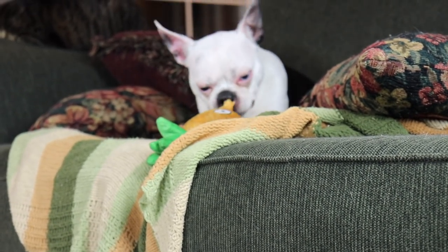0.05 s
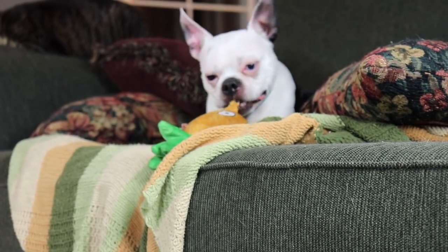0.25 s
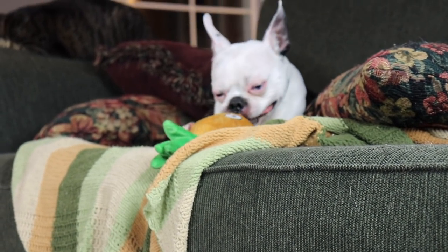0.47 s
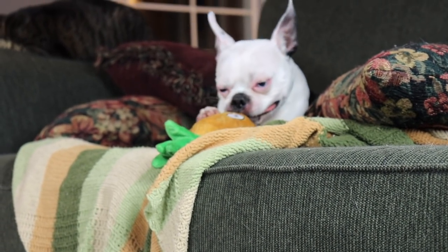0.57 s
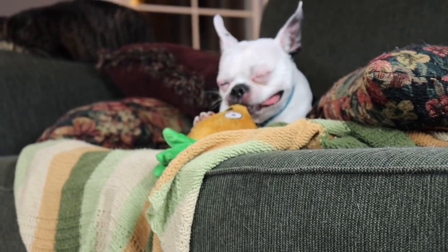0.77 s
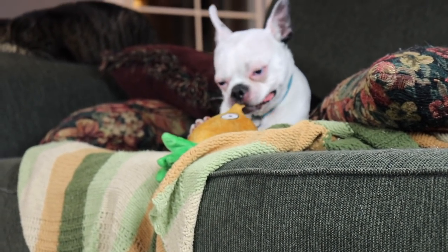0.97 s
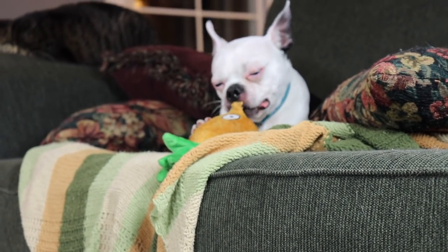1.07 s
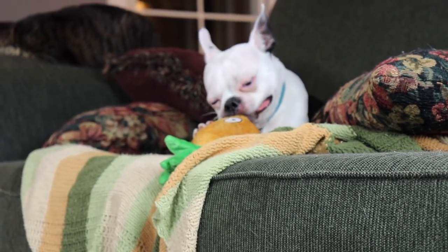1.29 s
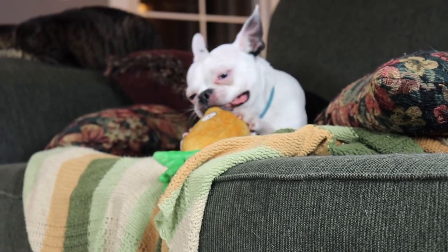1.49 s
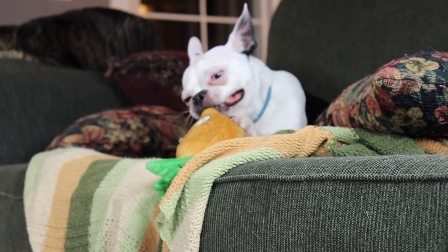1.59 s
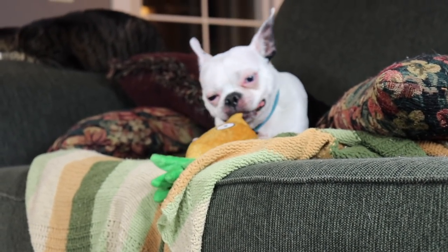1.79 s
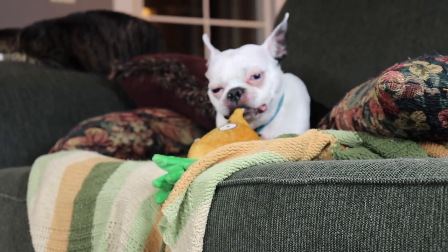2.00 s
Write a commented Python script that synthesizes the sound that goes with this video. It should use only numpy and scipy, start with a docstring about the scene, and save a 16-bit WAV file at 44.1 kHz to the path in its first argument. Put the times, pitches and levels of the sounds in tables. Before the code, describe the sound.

A plush toy squeaks as a small dog chews it, a few metres away in a slightly echoing room. A faint squeak dies away at the start. A loud, rising, raspy squeak comes at 0.2 seconds and a softer one at 0.7, with jaw clicks, soft cushion thuds and hissing air between. Wet clicks and snuffles follow from 1 second, then a snort around 1.7, over faint room noise.

```python
"""A small dog chews a plush toy on a sofa in a live living room, a few metres away.
First a squeak dies away; then a hard bite drives air through the toy's reed squeaker.
The jaws click, the cushions thud softly, and air hisses back in with a faint thin whistle.
A softer bite sounds the reed again. After it the jaws click and smack on the wet plush,
and the dog snuffles and finally snorts, over steady room air and a faint hum."""
import sys
import numpy as np
from scipy import signal
from scipy.fft import rfft, irfft
from scipy.io import wavfile

SR = 44100
rng = np.random.default_rng(int(sys.argv[2]) if len(sys.argv) > 2 else 0)


def int16_out(signal):
    """Quantize to a 16-bit WAV file."""
    q = np.round(np.clip(np.atleast_2d(signal).T, -1, 1) * 32767)
    wavfile.write(sys.argv[1], SR, q.astype(np.int16))


N = 90404

# the reed in each squeak: (time [s], pitch [Hz], level [dB], roughness [ratio, capped at 1])
DYING_SQUEAK = [(0, 1964, -43.5, .5), (.012, 2018, -55, 0.55), (.028, 1989, -61, .3),
                (.042, 1987, -70, 0.23), (.052, 2000, -79, .4)]
HARD_SQUEAK = [(.18, 1316, -54, 0.1), (.192, 1313, -31, 0.1), (.207, 1354, -27.5, 0.2),
               (.24, 1395, -28, 0.3), (.258, 1458, -24.5, 0.54), (.272, 1546, -23.5, 0.52),
               (.284, 1774, -22.5, 0.77), (.302, 1801, -26.5, 0.65), (.316, 1796, -24.5, 0.97),
               (.324, 1484, -16.5, 1.23), (.336, 1358, -36, 1.2)]
SOFT_SQUEAK = [(.697, 1238, -40, 0.22), (.717, 1266, -31.5, 0.26), (.755, 1313, -33.5, 0.13),
               (.78, 1333, -28.5, 0.27), (.792, 1360, -28.5, 0.2), (.826, 1445, -27, 0.27),
               (.855, 1476, -27, .35), (.864, 1427, -24.5, 1), (.876, 1284, -31.5, 1)]
# the squeaker's frequency response in each squeak: (frequency [Hz], gain [dB])
DYING_RESPONSE = [(2000, 2), (4000, -3), (6000, -13), (8000, -14), (10000, -43), (15000, -33)]
HARD_RESPONSE = [(1300, 1), (1800, -2), (2750, -3), (4100, -6), (5500, -3), (6900, -6), (8300, -12),
                 (10500, -23.5), (15000, -25.5)]
SOFT_RESPONSE = [(1300, -0.5), (2700, 0), (4000, -3.5), (5300, 1.5), (6600, -1.5), (8000, -10),
                 (10500, -20.5), (15000, -22.5)]
# teeth and tongue on the toy:
# (time [s], level [dB], resonance [Hz], bandwidth [Hz], decay [s], tick relative to ring [dB])
CLICKS = [(.001, -44.5, 1620, 390, 0.0043, -11.5), (.008, -39.5, 1800, 905, 0.001, -3.5),
          (.038, -69, 1350, 910, 0.001, -22), (.054, -53, 10500, 6000, 0.0025, -5),
          (.409, -34.5, 2040, 900, 0.00067, -29), (.464, -52, 11000, 7000, 0.0045, 11.5),
          (0.4901, -25.5, 1052, 486, .0012, -35), (0.4898, -34.5, 2880, 1110, 0.0086, -30),
          (.516, -37.5, 867, 304, 0.0027, -10), (0.808, -28, 1540, 1190, 0.001, -9),
          (.845, -41, 1080, 313, 0.036, -26), (1.057, -41, 930, 293, 0.0029, 0),
          (1.067, -35, 3020, 1810, 0.003, -3.5), (1.071, -53, 1050, 385, 0.0014, -31),
          (1.248, -44, 7530, 1980, 0.0023, -3), (1.251, -53.5, 14050, 2140, 0.002, 4),
          (1.254, -35.5, 1460, 755, 0.0021, -12), (1.41, -62.5, 6610, 4900, 0.0028, 6),
          (1.268, -34.5, 1400, 680, 0.0023, -32), (1.443, -42, 1570, 590, 0.0047, -1.5),
          (1.444, -58, 14000, 1800, 0.0027, 4), (1.461, -35.5, 6800, 6000, 0.0012, -13),
          (1.591, -50, 1000, 1220, 0.0049, -7), (1.607, -50, 1360, 500, 0.0037, -30),
          (1.691, -43, 604, 453, 0.006, -23)]
# spectrum of the wet tick: (frequency [Hz], gain [dB])
TICK_SPECTRUM = [(200, -10), (1500, 3.5), (4000, -5.5), (8500, -3.5), (12000, -17.5), (16000, -47)]
# mouth cavity pops and slack-reed whistles:
# (time [s], duration [s], level [dB], start pitch [Hz], end pitch [Hz])
MOUTH_POPS = [(1.253, 0.0042, -28.5, 1290, 1170), (1.264, 0.0145, -28.5, 1067, 1480),
              (1.298, 0.0068, -54, 1244, 1290), (1.69, 0.013, -36, 410, 507), (1.712, .02, -32, 730, 890),
              (1.828, 0.015, -36, 880, 908)]
REED_WHISTLES = [(0, .014, -51.5, 12600, 12600), (0.639, 0.028, -53, 11620, 11500),
                 (1.1, .015, -62, 12600, 12750), (1.527, 0.0096, -52, 11800, 11200),
                 (1.292, 0.027, -66, 15000, 15150), (1.875, 0.038, -60, 12700, 12700)]
# snuffles and snort:
# (time [s], rise [s], fall [s], level [dB], throat resonance [Hz], nasal resonance [Hz])
SNUFFLES = [(1.04, 0.036, 0.019, -43.5, 861, 2420), (1.703, 0.014, 0.077, -37, 780, 1360),
            (1.735, 0.026, 0.052, -35, 790, 2250), (1.795, 0.019, 0.074, -38.5, 880, 2600)]
# frequency response of the nose: (frequency [Hz], gain [dB])
NOSE_RESPONSE = [(150, -24), (450, -2), (1500, -18), (3000, -17), (4200, -4.5), (5200, -27), (6200, -7.5),
                 (7000, -30), (8200, -33), (10000, -35), (12500, -38), (15000, -46)]
# air drawn through toy, wet plush and muzzle, and thuds in the cushions:
# (time [s], rise [s], fall [s], level [dB], centre [Hz], bandwidth [Hz])
HISSES = [(0.621, 0.038, 0.069, -44.5, 2620, 487), (0.636, 0.047, 0.033, -45, 3620, 286),
          (0.674, 0.015, 0.024, -56, 10600, 4500), (.84, .012, 0.014, -44, 11000, 6000),
          (1.038, 0.013, 0.0074, -38.5, 2430, 400), (1.055, 0.028, 0.026, -43.5, 920, 200),
          (1.11, 0.0071, 0.0055, -44, 2480, 300), (1.202, 0.0067, 0.032, -65, 8800, 4000),
          (1.448, 0.011, 0.049, -44.5, 7850, 4470), (1.452, 0.014, 0.023, -46, 1340, 405),
          (1.53, 0.017, 0.02, -52, 5100, 2900), (1.7, 0.009, .012, -46, 7700, 300),
          (1.746, 0.013, 0.0055, -43.5, 6000, 218), (1.812, 0.024, 0.013, -50.5, 7940, 1200),
          (1.705, .012, .03, -68, 12700, 900)]
CUSHION_THUDS = [(0.096, 0.0033, 0.018, -47, 158, 68.4), (0.101, .02, 0.18, -69, 45.3, 25),
                 (0.491, 0.011, 0.039, -42, 153, 54), (0.893, 0.011, 0.03, -56, 44.4, 25),
                 (0.882, 0.013, 0.026, -51, 157, 80), (1.269, 0.018, 0.15, -67, 45.4, 25),
                 (1.4, 0.011, 0.054, -54, 167, 73)]
# reflections from the nearest surfaces: (delay [s], gain [dB])
ECHOES = [(.0042, -14.5), (0.0178, -18.5), (0.0233, -4.5), (0.034, -5)]
# reverberation time: (frequency [Hz], time to fall by 60 dB [s])
ROOM_T60 = [(150, 0.1), (600, 0.45), (1500, 0.44), (4000, 0.42), (8000, 0.3), (15000, 0.08)]
# spectrum of the room air: (frequency [Hz], relative spectral density [dB])
AIR_SPECTRUM = [(15, -61), (25, -29), (64, -65), (107, -4.5), (221, 6.5), (457, 6.5), (722, -0.5),
                (1240, 3), (1950, -8.5), (3830, -11), (4500, -15.5), (7910, -18.5), (15500, -32.5)]


def squeak(curve, response, jitter=0.022, shimmer=0.32, brightening=0.11, rasp_db=-19):
    """Nonlinear reed oscillation: stronger drive enriches the harmonics; a rough reed shakes and rasps."""
    times, hz, db, roughness = np.transpose(curve)
    t = np.arange(times[0], times[-1], 1 / SR)
    rough = np.clip(np.interp(t, times, roughness), 0, 1)
    pitch = np.interp(t, times, hz) * (1 + jitter * rough * wander(hz=600, size=len(t)))
    phase = 2 * np.pi * np.cumsum(pitch) / SR
    level = np.interp(t, times, db)
    slack_db = level - level.max()
    reed = np.zeros(len(t))
    for k in range(1, 13):
        harmonic_db = read(response, k * pitch) + brightening * slack_db * np.log(k)
        reed += amp(harmonic_db) * (k * pitch < SR / 2) * np.sin(k * phase)
    air = noise(lambda f: amp(read(response, f)) * np.minimum(f / 4500, 1) ** 2, len(t))
    shake = 1 + shimmer * rough * wander(hz=154, size=len(t))
    return times[0], amp(level) * (unit(reed) * shake + amp(rasp_db) * rough * air)


def jaw_click(start, db, hz, width, decay, tick_db):
    """Impact excitation: a snap rings a damped mouth resonance, with a bright wet tick."""
    t = np.arange(0, 5 * decay + 2 / width, 1 / SR)
    fade = np.exp(-t / decay)
    edges = np.clip([hz - width / 2, hz + width / 2], 50, SR / 2 - 500)
    cavity = signal.butter(2, edges, "bandpass", fs=SR, output="sos")
    ring = signal.sosfilt(cavity, fade * noise(np.ones_like, len(t)))
    tick = fade * noise(lambda f: amp(read(TICK_SPECTRUM, f)), len(t))
    return start, amp(db) * (unit(ring) + amp(tick_db) * unit(tick)) / 2


def pop_or_whistle(start, duration, db, start_hz, end_hz, waver=0.008):
    """Single-mode oscillation: the mouth cavity or slack reed gives a brief, unsteady gliding tone."""
    progress = np.arange(0, duration, 1 / SR) / duration
    glide = start_hz + (end_hz - start_hz) * progress
    pitch = glide * (1 + waver * wander(hz=300, size=len(progress)))
    phase = 2 * np.pi * np.cumsum(pitch) / SR
    return start, amp(db) * np.sin(np.pi * progress) * np.sin(phase)


def snuffle(start, rise, fall, db, throat_hz, nasal_hz, flutter=0.4, crackles_per_s=290):
    """Source and filter: throat and nose resonances shape fluttering breath and wet crackle."""
    air = rng.standard_normal(N) * np.exp(flutter * wander(hz=220, size=N))
    crackle = rng.uniform(-0.93, 1, N) * (rng.random(N) < crackles_per_s / SR)
    source = unit(air) + amp(-5) * unit(crackle)
    f = np.fft.rfftfreq(N, 1 / SR)
    throat = amp(6.5) * resonance(f, throat_hz, width=122)
    nasal = amp(4.5) * resonance(f, nasal_hz, width=1050)
    tract = amp(read(NOSE_RESPONSE, f)) + throat + nasal
    envelope = swell(rise, fall)
    breath = irfft(rfft(source) * tract, N)[:len(envelope)]
    return start, amp(db) * envelope * unit(breath)


def hiss_or_thud(start, rise, fall, db, hz, width):
    """Resonant filtering: a swell of noise is a hiss in a high band and a thud in a low one."""
    envelope = swell(rise, fall)
    return start, amp(db) * envelope * noise(lambda f: resonance(f, hz, width), len(envelope))


def room(sound, tail_db, build_up_s=0.002, echo_cutoff_hz=2500):
    """Reverberation: direct sound, dull early reflections and a tail that lasts longest in the midrange."""
    hz, t, spectra = signal.stft(rng.standard_normal(SR), SR, nperseg=256)
    decay = amp(-60 * t / read(ROOM_T60, hz)[:, None])
    tail = signal.istft(spectra * decay, SR, nperseg=256)[1][:SR]
    tail *= np.minimum(np.arange(SR) / SR / build_up_s, 1) ** 2
    response = amp(tail_db) * tail / np.linalg.norm(tail)
    response[0] += 1  # direct path
    smear = np.exp(-2 * np.pi * echo_cutoff_hz * np.arange(64) / SR)
    for delay, db in ECHOES:
        add(response, delay, amp(db) * smear / smear.sum())
    return signal.fftconvolve(sound, response)[:N] / np.linalg.norm(response)


def background(air_db=-56, hum_hz=122.6, hum_db=-74):
    """Stationary noise floor: broadband room air and a faint sinusoidal hum."""
    air = noise(lambda f: amp(read(AIR_SPECTRUM, f)), N)
    hum = np.sqrt(2) * np.sin(2 * np.pi * hum_hz * np.arange(N) / SR)
    return amp(air_db) * air + amp(hum_db) * hum


def amp(db):
    """Decibel law: 20 dB is a tenfold amplitude."""
    return 10 ** (np.asarray(db) / 20)


def unit(x):
    """Normalisation to rms 1."""
    return x / np.sqrt(np.mean(x ** 2) + 1e-20)


def read(points, hz):
    """Interpolation of a table on a log-frequency axis."""
    f, value = np.transpose(points)
    return np.interp(np.log(hz + 1), np.log(f + 1), value)


def add(mix, start, sound):
    """Superposition: a sound joins the mix at start seconds."""
    part = mix[max(round(start * SR), 0):][:len(sound)]
    part += sound[:len(part)]


def noise(gain, size):
    """Spectral shaping: white noise weighted by gain(Hz), at rms 1."""
    white = rfft(rng.standard_normal(N))
    return unit(irfft(white * gain(np.fft.rfftfreq(N, 1 / SR)), N)[:size])


def resonance(f, hz, width):
    """Band-pass resonance with peak gain 1 and steep skirts."""
    detuning = (f * f - hz * hz) / (np.maximum(f, 1) * width * np.sqrt(2))
    return 1 / (1 + detuning ** 2)


def wander(hz, size):
    """Random modulation: noise low-passed at about hz."""
    return noise(lambda f: 1 / (1 + (f / hz) ** 4), size)


def swell(rise, fall):
    """Triangular amplitude envelope."""
    t = np.arange(0, rise + fall, 1 / SR)
    return np.interp(t, [0, rise, rise + fall], [0, 1, 0])


def scene():
    """Superposition: squeaker and chewing reverberate in the room, over the background."""
    toy, chewing = np.zeros(N), np.zeros(N)
    add(toy, *squeak(HARD_SQUEAK, HARD_RESPONSE))
    add(toy, *squeak(SOFT_SQUEAK, SOFT_RESPONSE))
    add(toy, *squeak(DYING_SQUEAK, DYING_RESPONSE))
    for source, events in ((jaw_click, CLICKS), (pop_or_whistle, MOUTH_POPS + REED_WHISTLES),
                           (snuffle, SNUFFLES), (hiss_or_thud, HISSES + CUSHION_THUDS)):
        for event in events:
            add(chewing, *source(*event))
    toy = amp(-1.0) * room(toy, tail_db=3.5)
    chewing = amp(-0.5) * room(chewing, tail_db=-7.5)
    return (toy + chewing + background())[None]


def record(dry):
    """Band limiting: a steep low-pass filter removes the highest treble."""
    lowpass = signal.firwin(511, cutoff=15900, window=("kaiser", 9), fs=SR)
    return signal.oaconvolve(dry, lowpass[None], "same")


dry = scene()
out = record(dry)
int16_out(out)
```